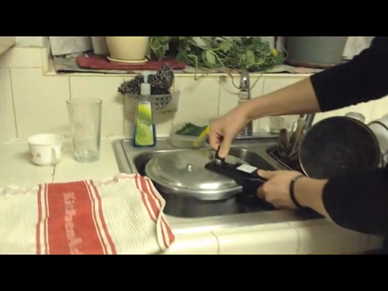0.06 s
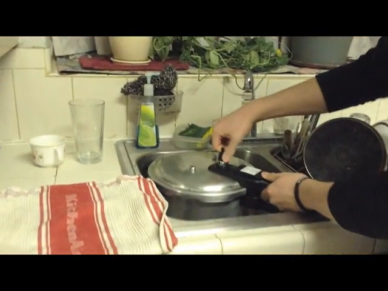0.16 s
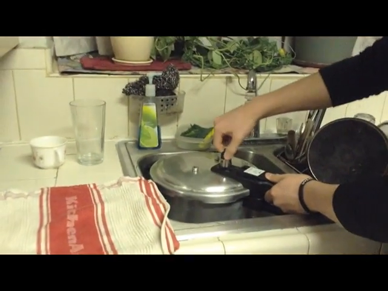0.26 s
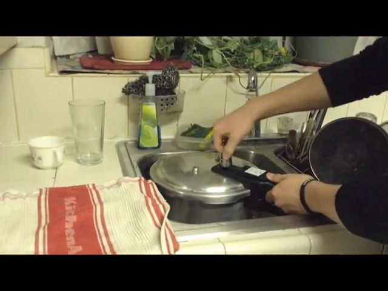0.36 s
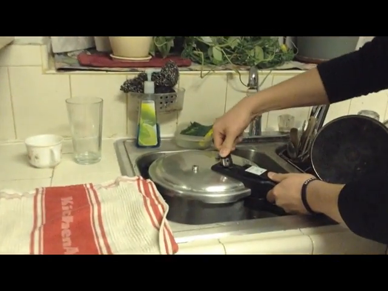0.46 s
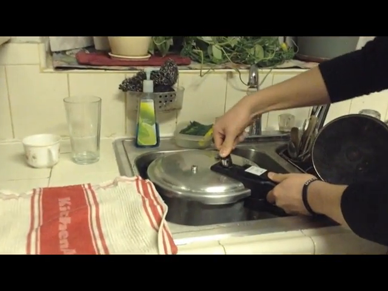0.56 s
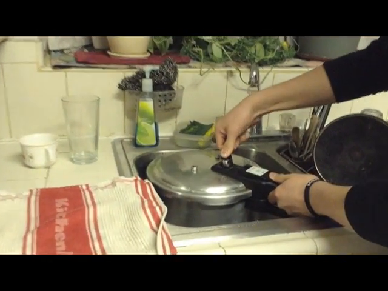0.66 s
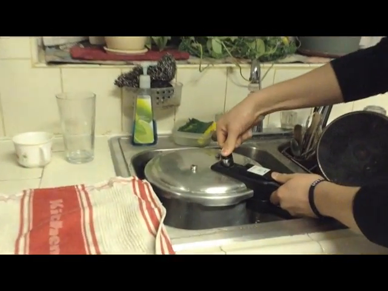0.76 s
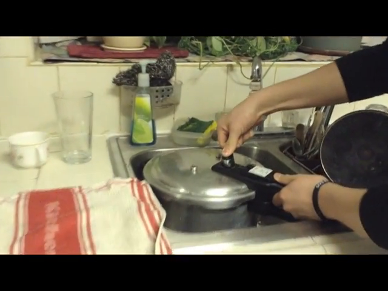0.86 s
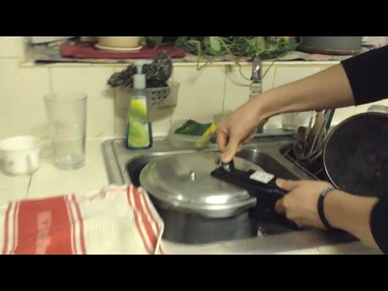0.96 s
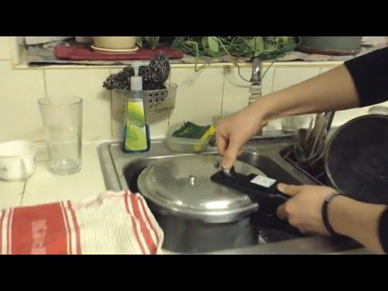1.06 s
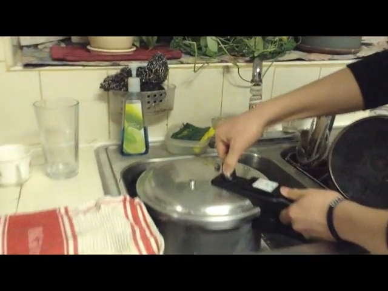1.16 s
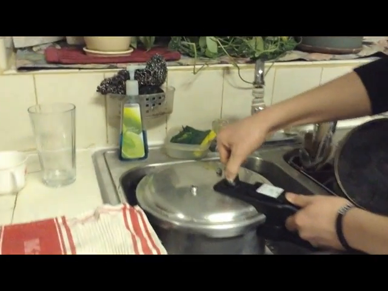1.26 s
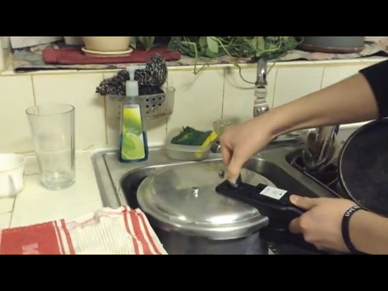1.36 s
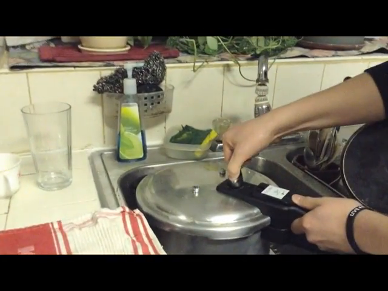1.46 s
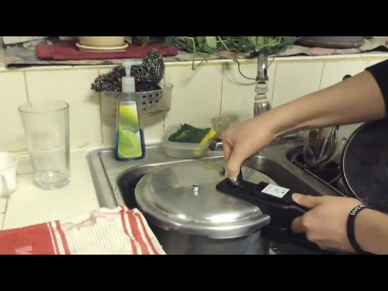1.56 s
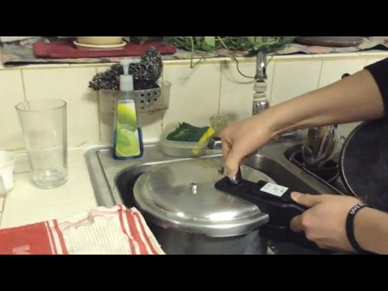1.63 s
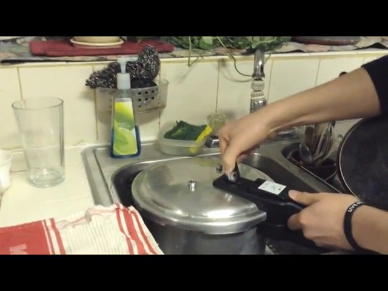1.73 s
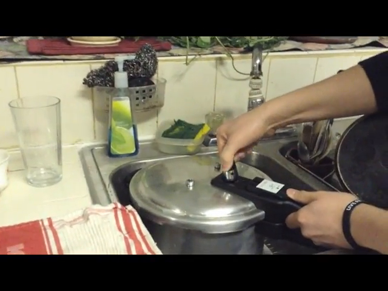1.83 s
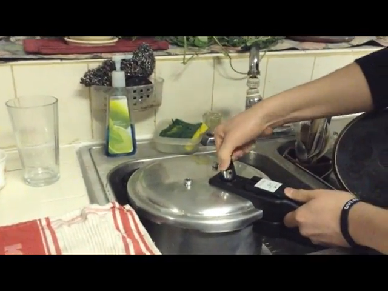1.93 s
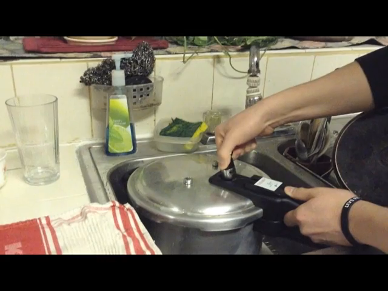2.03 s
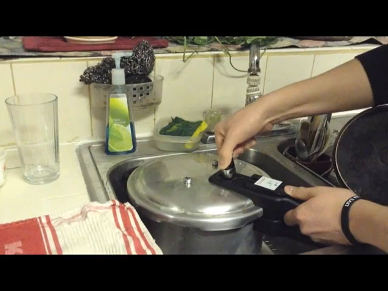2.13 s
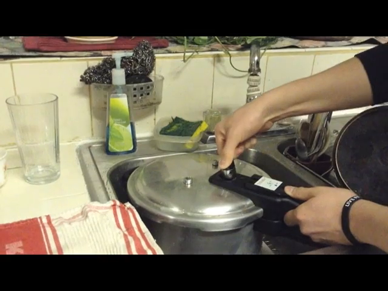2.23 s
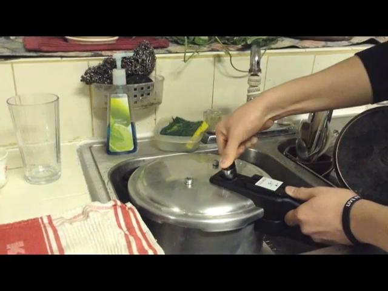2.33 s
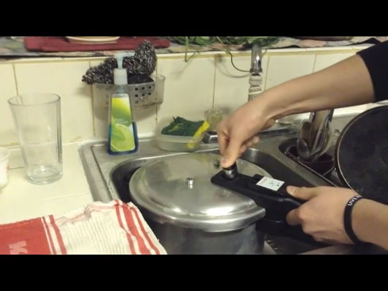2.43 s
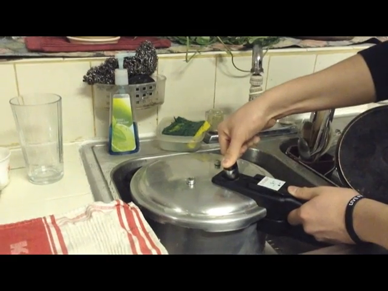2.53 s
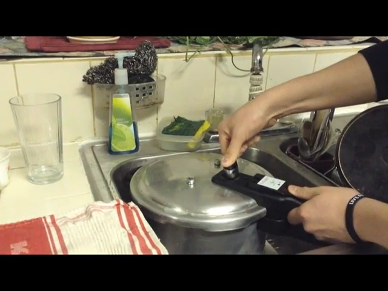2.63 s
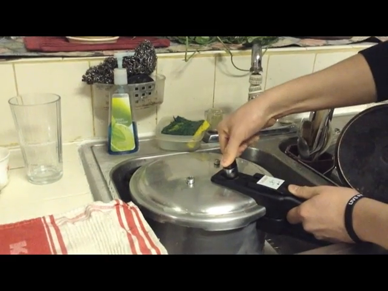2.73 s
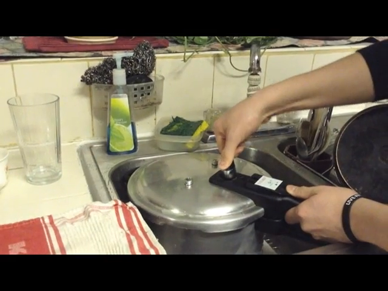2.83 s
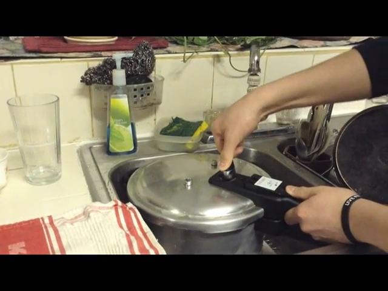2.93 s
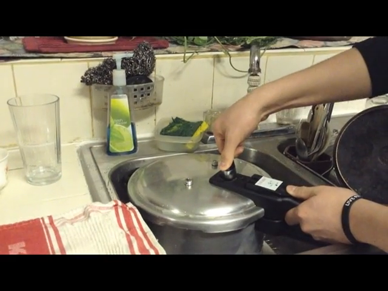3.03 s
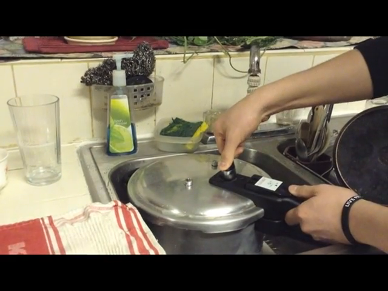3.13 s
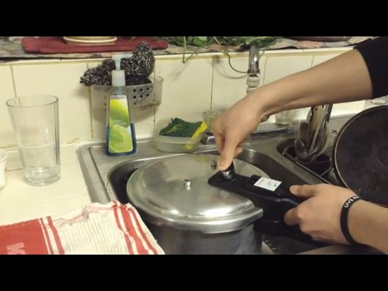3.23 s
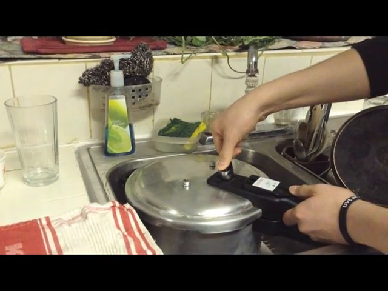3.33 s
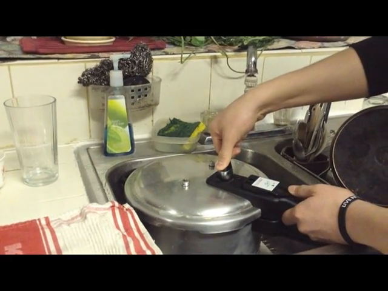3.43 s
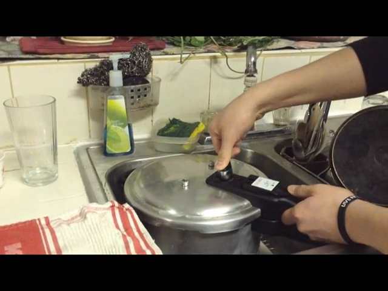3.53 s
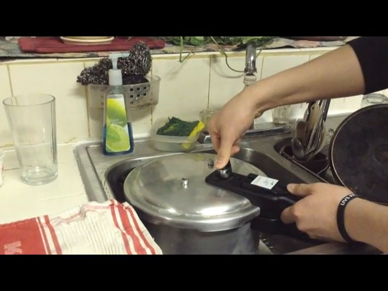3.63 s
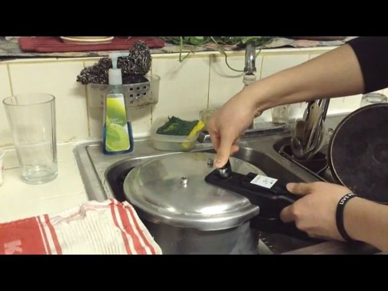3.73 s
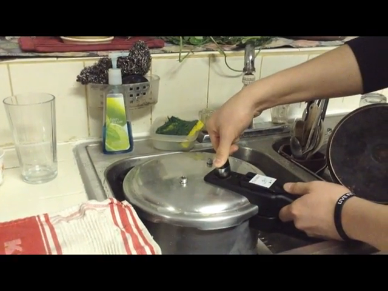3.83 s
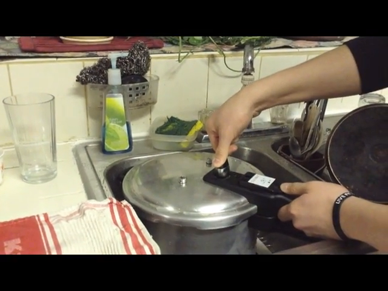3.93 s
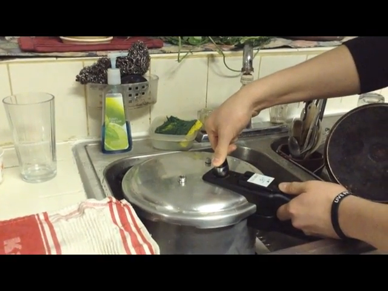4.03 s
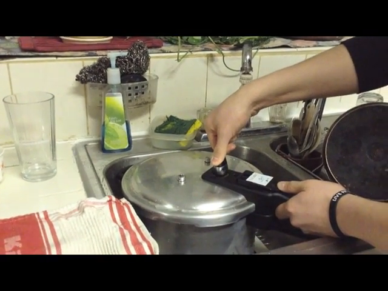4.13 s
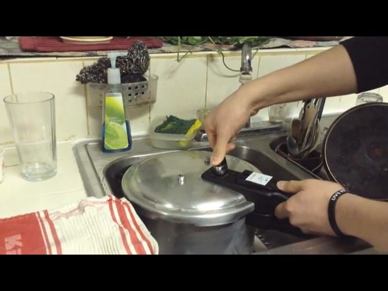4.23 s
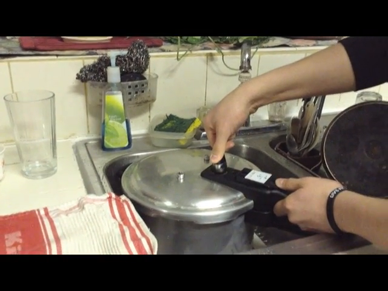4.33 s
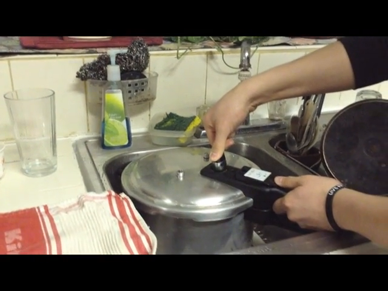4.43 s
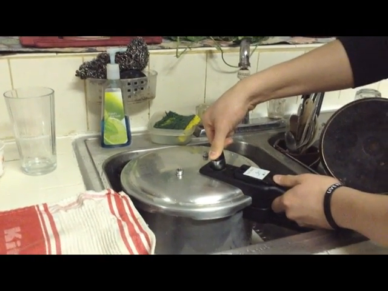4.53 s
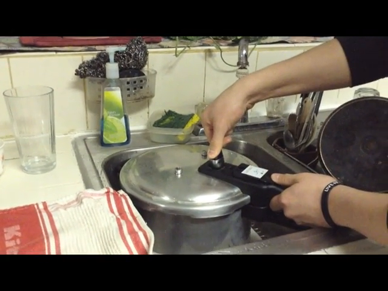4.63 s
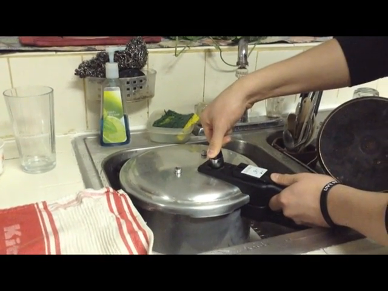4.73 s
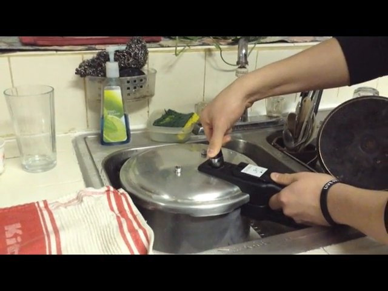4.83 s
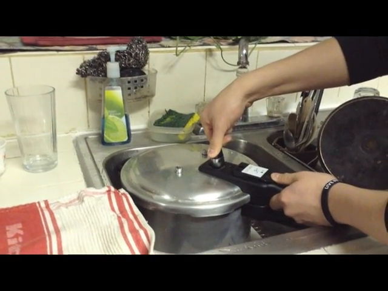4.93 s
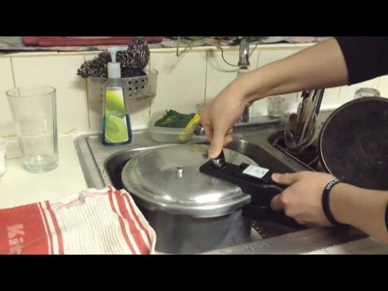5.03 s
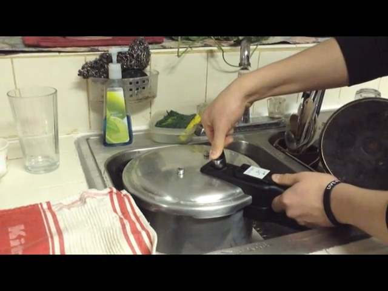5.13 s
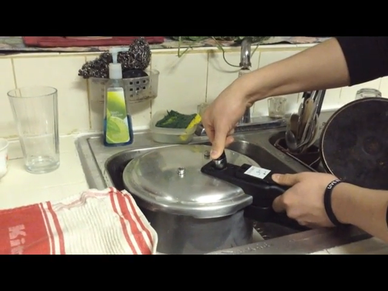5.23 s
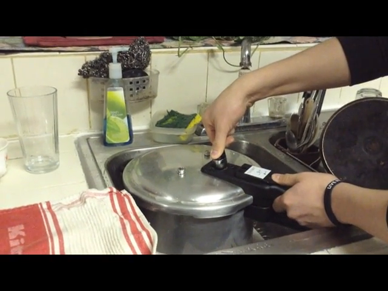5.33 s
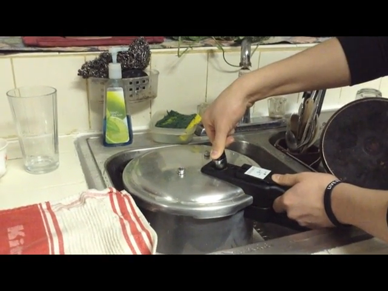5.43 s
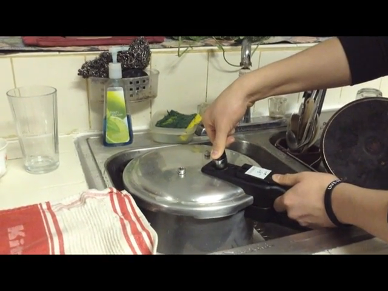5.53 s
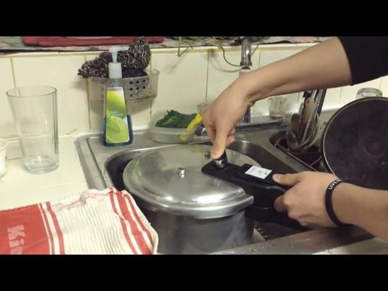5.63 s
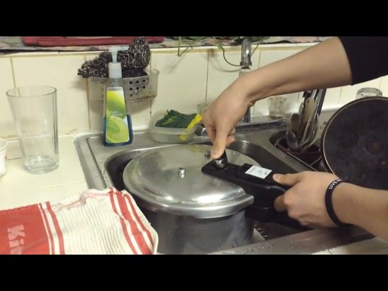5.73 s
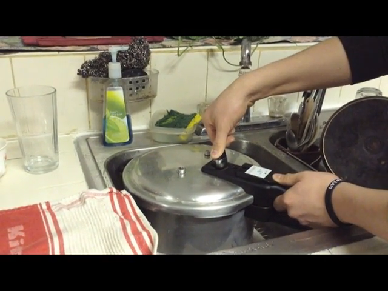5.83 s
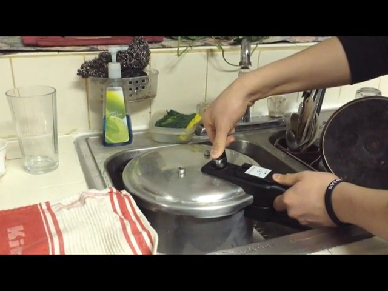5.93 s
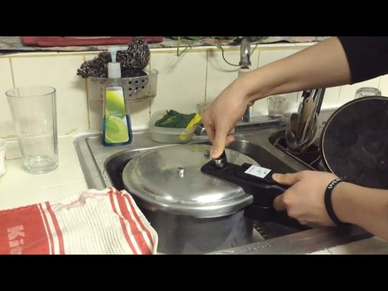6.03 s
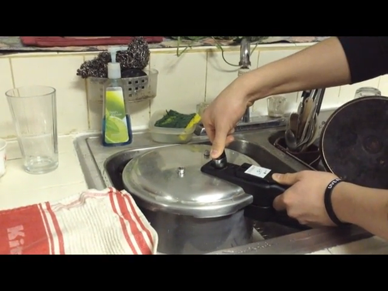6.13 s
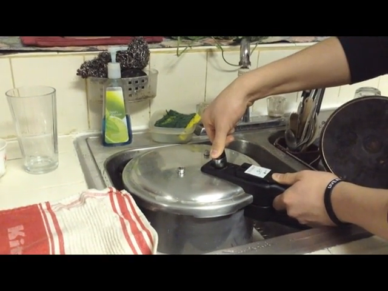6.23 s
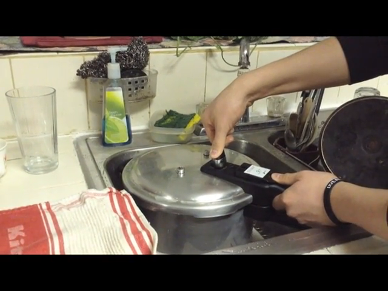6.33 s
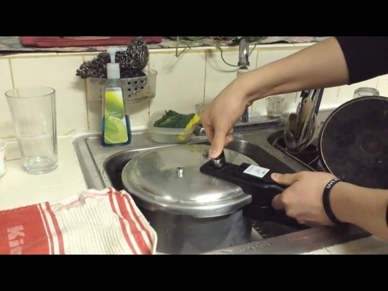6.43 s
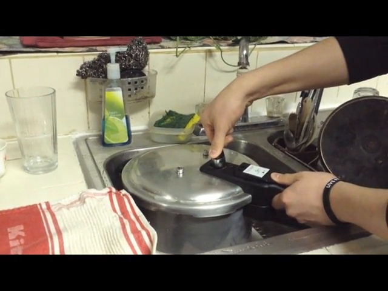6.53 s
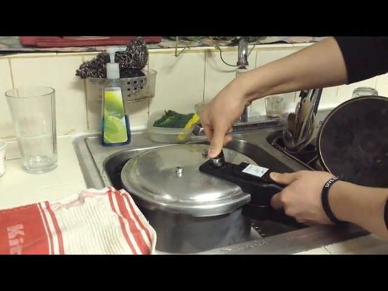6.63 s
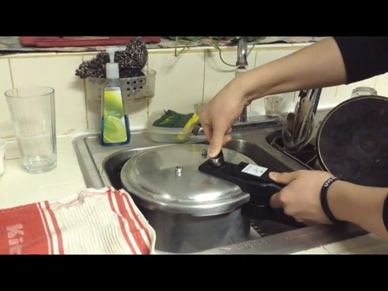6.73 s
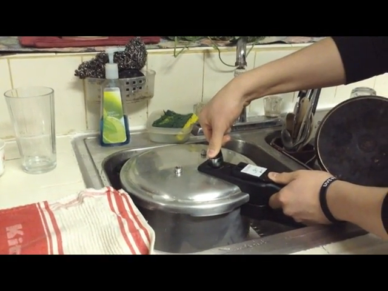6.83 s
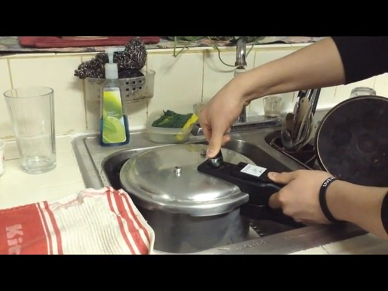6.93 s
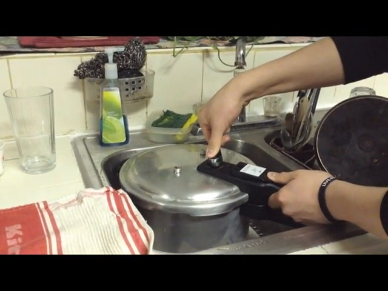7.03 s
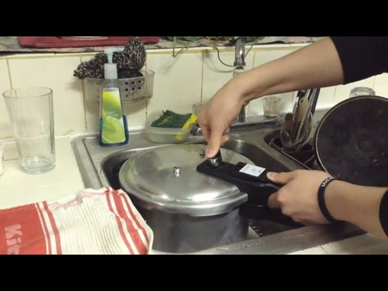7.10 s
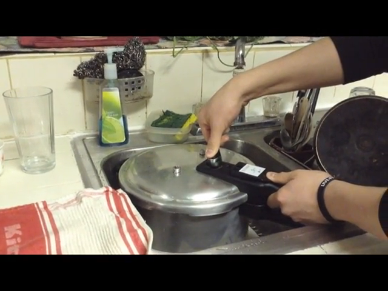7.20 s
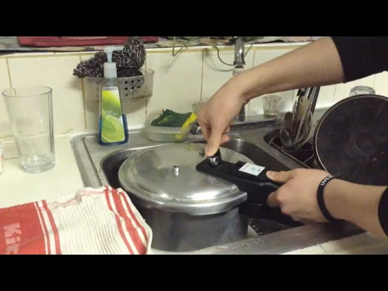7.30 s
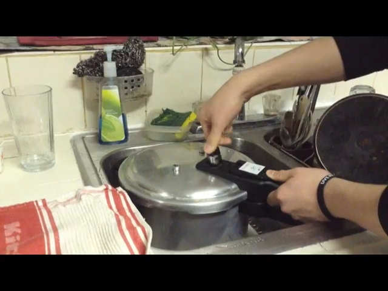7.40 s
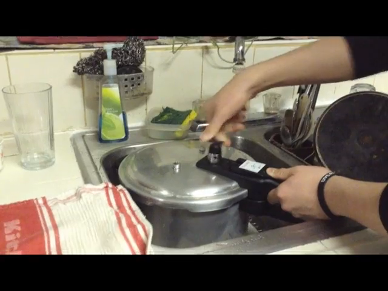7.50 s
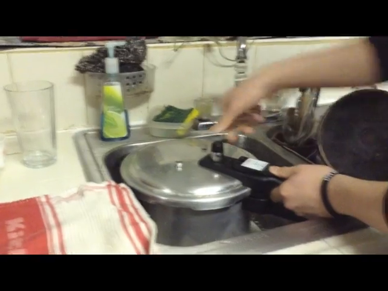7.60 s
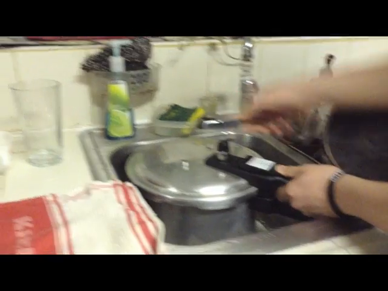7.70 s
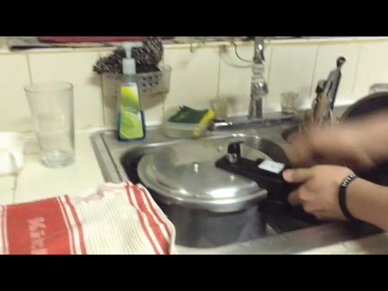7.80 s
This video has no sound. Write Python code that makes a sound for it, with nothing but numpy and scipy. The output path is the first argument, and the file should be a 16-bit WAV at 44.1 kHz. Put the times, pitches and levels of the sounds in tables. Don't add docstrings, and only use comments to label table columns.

```python
import sys
import numpy as np
from scipy import signal
from scipy.fft import rfft, irfft, next_fast_len
from scipy.io import wavfile
from scipy.ndimage import uniform_filter1d, map_coordinates

SR = 44100
rng = np.random.default_rng(int(sys.argv[2]) if len(sys.argv) > 2 else 0)


def bounce(signal):
    frames = np.transpose(np.atleast_2d(signal))
    limited = np.clip(frames, -1, 1)
    pcm = np.round(limited * 32767).astype(np.int16)
    wavfile.write(sys.argv[1], SR, pcm)


def invert_db(level):
    return 10 ** (np.asarray(level, dtype=float) / 20)


N = 346626
TIME = np.arange(N) / SR

# time in seconds, strength in dB.
PRESSURE = [(0, -31.5), (1.3, -33.5), (1.8, -33.5), (2.45, -35.5), (3.0, -37.5), (4.0, -41.5), (5.2, -46),
            (5.8, -48.5), (6.3, -53), (6.8, -61), (7.1, -70.5)]
# time in seconds, looseness from 0 to 1.
LOOSENESS = [(0, 0.9), (.64, 1), (.7, 0.54), (2.2, 0.16), (3, 0), (8, 0.17)]
# start in seconds, length in seconds, gap in dB.
ROCKS = [(0, 0.75, 6), (.12, 0.02, -2), (.15, 0.03, 2.5), (.19, .07, 1), (.27, 0.16, 4.5), (.275, .055, 2),
         (.362, 0.005, 3), (.383, .005, -3), (.44, 0.046, -2), (.497, 0.0063, 4), (.525, 0.01, 4),
         (.575, 0.018, 3), (.605, .01, -2.5), (.69, 0.04, -2), (.89, 0.01, 1), (.96, 0.0097, 1.5),
         (1.05, 1, -1), (1.62, 0.13, -1), (1.87, 0.063, 1.5), (2.0, 0.035, -1.5), (2.1, 0.56, 2),
         (5.17, 0.11, 1)]
# time in seconds, level over the fizz in dB.
SPITS = [
    (.011, 12.5),
    (.458, 4),
    (.575, -1),
    (.633, 1),
    (1.765, 9),
]
# pitch in Hz, width in Hz, level in dB.
VENT_OPEN = [(2767, 90, -29.5), (3280, 92, -16), (3550, 230, -7), (3940, 260, 2), (4180, 110, -5),
             (4420, 200, -4), (4760, 90, 1), (5020, 90, 3), (5190, 120, -1), (5530, 130, 1),
             (5880, 140, -6), (6000, 160, -12.5), (6300, 240, -14.5)]
# pitch in Hz, width in Hz, level in dB.
VENT_LOOSE = [(2436, 96, -14.5), (2796, 83, -8.5), (3150, 180, -8.5), (3564, 110, -5.5), (3896, 78, 2),
              (3980, 50, -3), (4195, 110, -8.5), (4380, 81, -2.5), (4490, 75, -5), (4720, 49, -1.5),
              (5070, 124, -3.5), (5530, 120, -12.5), (5700, 100, -14.5)]
# pitch in Hz, width in Hz, level in dB.
VENT_HELD = [(2890, 31, -15), (3010, 80, -14.5), (3200, 92, -18), (3460, 180, -6), (3614, 130, 1),
             (3725, 56, 0.5), (3900, 220, -5.5), (4165, 110, 0), (4480, 70, -2), (4730, 120, -1.5),
             (5048, 90, 0), (5186, 122, -.5), (5330, 160, -3.5), (5081, 87, -9), (5666, 55, -7.5),
             (6200, 46, -15.5), (5930, 50, -6.5)]
# frequency in Hz, level in dB per Hz.
FIZZ_LOOSE = [(8000, -43.5), (9500, -17), (11300, -13), (12300, -3), (13000, 1), (13700, -2), (14500, -8),
              (15400, -12)]
# frequency in Hz, level in dB per Hz.
FIZZ_HELD = [(8800, -48), (9800, -27.5), (11000, -17), (12000, -10), (13000, -5), (13700, 1.5), (14500, -2),
             (15500, -13)]
# pitch in Hz, width in Hz, level in dB.
FIZZ_WEAK = [(9970, 380, -22), (11130, 300, -20.5), (11850, 250, -25), (12340, 350, -18), (12900, 250, -19),
             (13040, 290, -10), (13830, 720, -4), (14330, 220, 1), (14520, 300, -2), (14970, 260, -11),
             (15300, 180, -6)]
# frequency in Hz, level in dB per Hz.
SPRAY = [(4000, -42.5), (5600, -5), (6100, -3), (6300, -2), (7000, -2.5), (8500, -7), (10000, -7),
         (12000, -33)]
# frequency in Hz, level in dB per Hz.
ROAR = [(59, -67), (100, -34), (250, -21), (420, -32), (538, -15.5), (985, -15), (1080, -11), (1320, -8.5),
        (2000, -6.5), (3400, 5.5), (4420, -31.5), (7480, -120)]
# pitch in Hz, level in dB.
LID_SONG = [(820, -6), (1258, 0), (1800, -14)]
# pitch in Hz, width in Hz, level in dB.
LID_SHAKE = [(540, 28, -8), (1065, 45, -1), (1250, 30, -2), (1630, 120, -5), (1785, 45, -1), (1900, 40, -5),
             (290, 80, -19)]
# pitch in Hz, width in Hz, level change in dB.
SLOTS = [(3300, 60, -3), (4350, 170, -11), (4790, 120, -15), (5500, 78, 2), (5960, 90, -7),
         (6120, 160, -19), (6370, 70, -12), (6530, 110, -14), (6700, 60, -8), (6880, 60, -9),
         (7950, 120, -6), (8250, 150, -10.5), (9880, 260, -9), (10800, 90, -5), (11090, 90, -12),
         (11550, 200, -17), (12060, 60, -10), (14430, 120, -6), (15170, 100, -9)]
# pitch in Hz, width in Hz, depth in dB.
SINK = [(2180, 50, -10), (2410, 40, -4), (2660, 70, -7), (3390, 50, -9), (3810, 60, -6), (4020, 90, -4),
        (4330, 90, -6), (4545, 45, -8), (4915, 45, -8), (5400, 50, -5), (5590, 50, -5), (5830, 60, -7),
        (6160, 60, -6), (6700, 80, -2)]
# time in seconds, peak in dB, brightness in dB per octave.
KNOCKS = [(0.287, -23, 5), (0.497, -47, 5), (0.575, -44, -6), (0.635, -34, -18), (0.75, -34.5, -21),
          (0.86, -33.5, 8.5), (0.891, -31, 22), (1.055, -51, 4), (1.23, -31, 8), (1.365, -34, -14),
          (1.989, -61, -2), (2.172, -46.5, -13), (2.248, -31.5, 0), (2.279, -38, -14), (2.356, -38.5, -9),
          (2.406, -43, -16)]
# pitch in Hz, level in dB, time to fade by 60 dB in seconds.
LID = [(543, 7.5, 0.11), (560, -4, 0.11), (617, 0.5, 0.18), (700, -7.5, .08), (805, 6, 0.14),
       (1075, -1.5, 0.061), (1250, -10.5, 0.064), (1880, 4.5, 0.12), (2050, -7, 0.073)]
# time in seconds, peak in dB, slap over peak in dB, brightness in dB per octave.
BUMPS = [(0.009, -39.5, 6.5, -15), (0.897, -61, -9, -1), (1.761, -32.5, -2.5, 2), (1.784, -32, -7.5, -3.5),
         (2.54, -52.5, -12, -3), (3.652, -52, -12, -1), (3.723, -57.5, 7.5, 5), (4.079, -60, 1, -8),
         (4.359, -76, -6, -2), (4.569, -51.5, 0, -8), (4.808, -56, -2, -5), (5.174, -56, 4, -7),
         (5.618, -52, -3, -11), (6.284, -51, -18, 2), (7.117, -51, -8, 9), (7.17, -58, -12, -8),
         (7.383, -51.5, -4.5, -19)]
# pitch in Hz, level in dB, time to fade by 60 dB in seconds.
BASIN = [(125, -9, 0.2), (151, -3.5, 0.25), (176.3, -1, 0.22), (205, -3.5, 0.2), (260, -6, .15),
         (323, -6.5, 0.12), (344, -2, 0.17), (509, 5, 0.16), (534, 1, .14), (680, 0.5, 0.204),
         (870, 2, 0.11)]
# time in seconds, peak in dB, ring over crack in dB,
# brightness in dB per octave, damping while it still touches (times the normal fading speed).
DROPS = [
    (7.5333, -10, -25, 3, 1.5),
    (7.5343, -6, 6, 1, 1.9),
    (7.5372, -8, -20, 0, 1.5),
    (7.5435, -22, -8, 2, 2),
    (7.553, -23, -6, 4, 1.5),
    (7.5622, -15.5, 7, 0, 1.4),
    (7.5711, -23, -1, 2, 1.3),
]
# pitch in Hz, level in dB, time to fade by 60 dB in seconds.
WEIGHT = [(248, -17, .15), (340, -15, .1), (500, -15, .12), (670, -15, .14), (765, -12, .2),
          (1100, -5, .07), (1146, 1, .14), (1190, 0, .05), (1280, 0, .05), (1345, 0, .14), (1411, -5, .12),
          (1805, -3, .11), (1990, -6, .11), (2250, -10, .1), (2525, -10, .1), (2650, -8, .12),
          (2960, -9, .1), (3390, -10, .12), (3520, -9, .1), (4544, -18, .1), (4786, -18, .1),
          (4936, -15, .07), (5450, -23, .1), (6430, -20, .07)]
# time in
# seconds, crack in dB, ping in dB, ping pitch in Hz, time to fade by 60 dB in seconds.
TICKS = [(.79, -56, -37, 1800, .04), (0.881, -60, -39, 560, 0.042), (.892, -60, -34, 1200, .04),
         (1.053, -60, -47, 660, 0.11), (1.075, -60, -37, 2050, 0.059), (1.15, -65, -40, 1250, 0.098),
         (1.245, -65, -46, 820, 0.1), (1.37, -65, -45, 820, 0.099), (1.44, -65, -45, 1248, 0.2),
         (1.88, -65, -53, 1268, .25), (1.8, -62, -41.5, 796, .1), (1.85, -62, -47, 540, .1),
         (1.91, -65, -49, 820, .15), (2.065, -58, -45.5, 820, 0.15), (1.985, -45.5, -40, 1260, 0.1),
         (1.985, -56, -36, 1850, 0.045), (2.215, -54, -44, 640, .05), (2.222, -62, -42, 1950, .04),
         (2.45, -62, -45, 600, 0.035), (2.505, -56, -50, 800, .04), (2.691, -68, -51, 1250, 0.13),
         (2.856, -58, -45, 1250, 0.15),
         (7.377, -43.5, -44, 3900, 0.026), (7.379, -50, -42, 3000, 0.014), (7.38, -51, -35, 1127, 0.019),
        (7.384, -60, -42, 1440, .02), (7.43, -59, -50, 3450, 0.024), (7.432, -65, -38, 1150, 0.018),
        (7.433, -65, -40, 1420, .018), (7.49, -65, -47, 450, 0.043), (7.509, -62, -53, 1150, 0.12),
        (7.516, -58, -62, 3000, .03), (7.511, -68, -59, 1150, .08), (7.593, -52, -48, 1416, 0.05),
        (7.642, -60, -43, 1350, .03), (7.65, -57, -54, 3550, 0.048), (7.702, -68, -55, 1400, .04),
        (7.761, -58, -49, 1410, 0.038), (7.764, -65, -45, 680, 0.042), (7.792, -68, -55, 3950, 0.044),
        (7.794, -73, -58, 11900, .05), (7.815, -58, -58, 13500, .012), (7.815, -65, -54, 3460, .04),
        (7.819, -55, -50, 2050, 0.04), (7.832, -53, -55, 3600, .02), (7.857, -52, -60, 3000, .02)]
# frequency in Hz, level in dB per Hz.
CRACK = [(88, -65), (150, -33), (400, -20), (549, -9), (880, -26), (1040, -26), (1340, -5.5), (2010, -12.5),
         (4910, -17.5), (8280, -36.5), (12000, -38.5), (15400, -52)]
# frequency in Hz, level in dB per Hz.
SCUFF = [(70, -29), (150, -1), (320, 1.5), (480, -14), (800, -3), (1500, -1), (2200, -3), (3300, -8),
         (5500, -21.5), (9000, -36), (15400, -39.5)]
# frequency in Hz, level in dB per Hz.
CLOTH = [(100, -31.5), (180, -9), (300, -7.5), (420, -16.5), (750, -2.5), (1300, -4.5), (2200, -10.5),
         (4000, -15.5), (7000, -26.5), (15400, -44)]
# start in seconds, length in seconds, level in dB.
STROKES = [(2.7, 2.5, -65.5), (2.86, .03, -59), (3.255, 0.015, -59), (3.66, 0.069, -54.5),
           (4.33, 0.075, -54.5), (4.53, 0.045, -56), (5.17, 0.041, -66), (5.33, 0.016, -61),
           (5.5, 1.14, -59.5), (6.26, 0.044, -64), (4.9, 0.33, -66.5), (7.13, 0.11, -58.5),
           (7.28, 0.25, -66), (7.69, 0.17, -60.5)]
# start in seconds, length in seconds, level in dB.
SECOND = [(1.25, 0.53, -67.5), (1.93, 0.15, -71), (2.54, 0.51, -66), (3.4, 0.54, -71), (4.03, 0.13, -69),
          (4.54, 0.045, -77), (4.85, 0.17, -67), (5.17, 0.091, -63), (5.55, 0.17, -66), (5.95, 0.83, -69.5),
          (6.3, 0.14, -67), (6.72, .3, -79), (7.05, 0.21, -68.5), (7.42, 0.39, -61.5), (7.66, .06, -68),
          (7.83, .05, -64)]
# start in seconds, length in seconds, level in dB.
THIRD = [
    (.4, 0.3, -58),
    (1.93, 0.16, -69),
    (2.54, 0.58, -66),
    (3.346, 0.24, -62),
    (5.19, 0.28, -62.5),
    (5.803, 0.95, -69),
    (7.12, .12, -67),
    (7.43, 0.45, -65),
]
# frequency in Hz, level in dB per Hz.
AIR = [(30, -10), (90, -24), (177, -8), (517, -19.5), (637, -8), (894, -10), (1100, -9), (1510, -12.5),
       (3210, -29.5), (8000, -31.5), (14000, -34), (15400, -38)]
# frequency in Hz, time to fade by 60 dB in seconds.
KITCHEN = [(200, 0.43), (1500, 0.26), (5000, 0.16), (12000, 0.16)]


def steam():
    strength_db = curve(PRESSURE)
    vent_db, fizz_db, spray_db, roar_db = jet_levels(strength_db)
    loose = np.clip(curve(LOOSENESS), 0, 1)
    held = np.sqrt(1 - loose)
    wide = np.clip((0.27 - TIME) / 0.03 + 1, 0, 1) * 0.8 + 0.1 * loose

    overtone = held ** 2 * rush(lambda hz: resonant([(10500, 620, 0)])(hz) ** 2, patchy_db=-2.5)
    jet = invert_db(vent_db - 22) * overtone
    jet += invert_db(vent_db + 1.88) * vent_whistle(loose, held)
    jet += invert_db(fizz_db + 0.65 + 4.5 * wide - 3 * loose) * fine_fizz(strength_db, wide)
    jet += invert_db(spray_db) * rush(coloured(SPRAY), patchy_db=-0.5)
    jet += invert_db(roar_db + 4.5) * (rush(coloured(ROAR), patchy_db=1.7) + lid_hum(loose, held))

    bite = np.clip((-35 - strength_db) / 7, 0, 1)
    jet = (1 - bite) * jet + bite * filtered(jet, dips(SLOTS))

    sputter_db = (0.2 + 0.15 * loose) * wobble(60)
    sputter_db += (0.25 + 0.7 * loose) * wobble(260)
    sputter_db += 0.2 * wobble(12)
    shut_db = -80 * np.clip((TIME - 7.1) / 0.11, 0, 1)
    return invert_db(shut_db + sputter_db) * jet


def jet_levels(strength_db):
    shape, db = holds(ROCKS, rise=0.018, fall=0.012)
    gap_db = np.sum(shape * db, axis=0)
    spit_s = 0.0122
    burst_db = sum(db * (TIME > s) * np.exp(-abs(TIME - s) / spit_s) for s, db in SPITS)
    below_full_db = strength_db + 33.5
    weak_db = 2 * np.minimum(strength_db + 46.5, 0)
    thin_db = 1.15 * np.minimum(strength_db + 41.5, 0)
    fizz_db = strength_db + weak_db - 0.11 * gap_db + burst_db
    spray_db = -43 + 1.6 * below_full_db + thin_db + 0.16 * gap_db + 0.79 * burst_db
    roar_db = -43.5 + 1.42 * below_full_db + weak_db + 0.96 * gap_db
    return strength_db + gap_db, fizz_db, spray_db, roar_db


def vent_whistle(loose, held):
    sunk = np.clip((TIME - 0.425) / 0.015, 0, 1)
    rocking = np.sqrt(1 - sunk) * rush(resonant(VENT_OPEN), patchy_db=0.7)
    rocking += np.sqrt(sunk) * rush(resonant(VENT_LOOSE), patchy_db=0.8)
    bore = lambda hz: resonant(VENT_HELD)(hz) / (1 + (hz / 5900) ** 16)
    return np.sqrt(loose) * rocking + held * rush(bore, patchy_db=0)


def fine_fizz(strength_db, wide):
    thin = np.clip((-37.5 - strength_db) / 14.5, 0, 1)
    half = [(hz, width, db / 2) for hz, width, db in FIZZ_WEAK]
    steep = lambda hz: resonant(half)(hz) ** 2
    narrow = (1 - thin) * rush(coloured(FIZZ_HELD), patchy_db=1)
    narrow += np.sqrt(1 - (1 - thin) ** 2) * rush(steep, patchy_db=2)
    return np.sqrt(wide) * rush(coloured(FIZZ_LOOSE), patchy_db=1) + np.sqrt(1 - wide) * narrow


def lid_hum(loose, held):
    fade = np.clip((2.45 - TIME) / 0.5, 0.45, 1) * np.clip((3.3 - TIME) / 0.4, 0, 1)
    song = invert_db(-14.5) * held ** 2 * singing(LID_SONG, drift_hz=7, flutter_db=3.5) * fade
    shake = loose ** 2 * rush(resonant(LID_SHAKE), patchy_db=1)
    return song + invert_db(-8.5 + 0.8 * wobble(17)) * shake


def drops():
    out = np.zeros(N)
    add(out, 7.094, invert_db(-45) * puff(SCUFF, t60=0.4, rise=0.0024))
    for s, crack_db, ping_db, hz, t60 in TICKS:
        crack = puff(CRACK, t60=0.06, rise=0.00065)
        ping = ring([(hz, 0, t60)], 0, scatter_db=0, damping=0.62)
        add(out, s, invert_db(crack_db) * crack + invert_db(ping_db) * ping)
    for s, db in [(7.546, -33), (7.584, -34)]:
        add(out, s, invert_db(db) * ring([(250, 0, 0.09)], 0, scatter_db=0, damping=1))
    for s, db, ring_db, tilt_db, damping in DROPS:
        metal = ring(WEIGHT, tilt_db, scatter_db=1, damping=damping)
        rattle = puff(CRACK, t60=0.014, rise=0.0004) + invert_db(-18) * puff(CRACK, t60=0.2, rise=0.002)
        add(out, s, invert_db(db - 3) * rattle + invert_db(db + ring_db - 6.5) * metal)
    return out


def knocks():
    out = np.zeros(N)
    for s, db, tilt_db in KNOCKS:
        lid = ring(LID, tilt_db, scatter_db=2, damping=2.2)
        click = puff(CLOTH, t60=0.075, rise=0.0019)
        add(out, s, invert_db(db + 1) * (lid + invert_db(-12) * click))
    for s, db, slap_db, tilt_db in BUMPS:
        basin = ring(BASIN, tilt_db, scatter_db=2, damping=1.4)
        slap = puff(SCUFF, t60=0.25, rise=0.006)
        add(out, s, invert_db(db - 0.9) * (basin + invert_db(slap_db) * slap))
    return out


def rustle():
    unevenness = invert_db(0.4 * wobble(70) + 0.84 * wobble(16))
    return swells(STROKES, rise=0.087, fall=0.055) * unevenness * rush(coloured(CLOTH), patchy_db=0.5)


def motor_hum():
    turn = 2 * np.pi * np.cumsum(93.1 + 0.5 * wobble(3) + 2.5 * wobble(30)) / SR
    second = invert_db(-80.5) + swells(SECOND, rise=0.15, fall=0.045)
    third = invert_db(-80.5) + swells(THIRD, rise=0.15, fall=0.045)
    hum = second * invert_db(2 + 3.2 * wobble(21)) * np.sin(2 * turn)
    hum += third * invert_db(-2.5 + wobble(11)) * np.sin(3 * turn)
    hum += invert_db(-79 + 1.4 * wobble(4)) * np.sin(4 * turn)
    return hum + invert_db(-92.5) * np.sin(turn)


def background():
    return invert_db(-64) * rush(coloured(AIR), patchy_db=0.5) + rustle() + motor_hum()


def kitchen(x):
    hz, t, z = signal.stft(rng.standard_normal(SR // 2), SR, nperseg=256)
    fading = invert_db(-60 * t / along(KITCHEN, hz)[:, None])
    tail = signal.istft(z * fading, SR, nperseg=256)[1]
    late = np.pad(x, (200, 0))
    return signal.fftconvolve(late, tail / np.linalg.norm(tail))[:N]


def unit(x):
    return x / np.sqrt(np.mean(x ** 2) + 1e-20)


def along(points, hz):
    f, v = np.transpose(points)
    return np.interp(np.log(hz + 1), np.log(f + 1), v)


def curve(points):
    s, v = np.transpose(points)
    return np.interp(TIME, s, v)


def wobble(rate):
    return map_coordinates(rng.standard_normal(int(N * rate / SR) + 4), [TIME * rate])


def holds(rows, rise, fall):
    start, length, value = np.transpose(rows)[:, :, None]
    ease = 0.24 * length
    up = np.clip((TIME - start + rise) / (rise + ease), 0, 1) ** (start > 0)
    down = np.clip((start + length + fall - TIME) / (fall + ease), 0, 1)
    return up * down, value


def swells(rows, rise, fall):
    shape, db = holds(rows, rise, fall)
    return np.sqrt(np.sum((shape * invert_db(db)) ** 2, axis=0))


def filtered(x, response):
    m = next_fast_len(len(x) + 8192)
    return irfft(rfft(x, m) * response(np.fft.rfftfreq(m, 1 / SR)), m)[:len(x)]


def coloured(spectrum):
    return lambda hz: invert_db(along(spectrum, hz))


def resonant(peaks):
    def response(f):
        return sum((-1) ** k * invert_db(db) * 1j * f * w / (c * c - f * f + 1j * f * w)
                   for k, (c, w, db) in enumerate(peaks))
    return response


def dips(rows):
    def response(f):
        return np.prod([(c * c - f * f + 1j * f * w * invert_db(db)) / (c * c - f * f + 1j * f * w)
                        for c, w, db in rows], axis=0)
    return response


def rush(response, patchy_db):
    z = signal.stft(rng.standard_normal(N), nperseg=512)[2]
    field = uniform_filter1d(rng.standard_normal(z.shape), size=6, axis=0)
    field = uniform_filter1d(field, size=8, axis=1)
    noise = signal.istft(z * invert_db(patchy_db * unit(field)), nperseg=512)[1][:N]
    return unit(filtered(noise, response))


def singing(modes, drift_hz, flutter_db):
    total = np.zeros(N)
    for hz, db in modes:
        phase = 2 * np.pi * np.cumsum(hz + drift_hz * wobble(40)) / SR
        total += invert_db(db + flutter_db * wobble(13)) * np.sin(phase)
    return unit(total)


def ring(modes, tilt_db, scatter_db, damping):
    hz, db, t60 = np.transpose(modes)[:, :, None]
    t = np.arange(SR // 4) / SR
    level = db + tilt_db * np.log2(hz / 1000) + scatter_db * rng.standard_normal(hz.shape)
    tone = np.sum(invert_db(level - 60 * t * damping / t60) * np.sin(2 * np.pi * hz * t), axis=0)
    return tone * (1 - np.exp(-t / 0.0033)) / np.sqrt(np.sum(invert_db(level) ** 2))


def puff(spectrum, t60, rise):
    t = np.arange(SR // 4) / SR
    noise = unit(filtered(rng.standard_normal(len(t)), coloured(spectrum)))
    return noise * invert_db(-60 * t / t60) * (1 - np.exp(-t / rise))


def add(track, s, sound):
    part = track[round(s * SR):][:len(sound)]
    part += sound[:len(part)]


def masked(x, depth_db, reach):
    hz, _, z = signal.stft(x, SR, nperseg=2048, noverlap=1024)
    bands = np.add.reduceat(abs(z) ** 2, np.arange(0, len(hz), 8))
    power = np.repeat(bands, 8, axis=0)[:len(hz)]
    power = uniform_filter1d(power, size=3, axis=1)
    upward = signal.lfilter([1 - reach], [1, -reach], power, axis=0)
    downward = signal.lfilter([1 - reach], [1, -reach], power[::-1], axis=0)[::-1]
    keep = (power > invert_db(-depth_db) ** 2 * (upward + downward)) | (hz < 4000)[:, None]
    return signal.istft(z * keep, SR, nperseg=2048, noverlap=1024)[1][:N]


def scene():
    hits = knocks() + drops()
    hiss = steam()
    walls = invert_db(-13) * kitchen(hiss)
    mono = invert_db(0.4) * filtered(hiss + walls, dips(SINK))
    mono += hits + invert_db(-11.5) * kitchen(hits) + background()
    return np.array([mono, mono])


def roll_off(x):
    return signal.sosfilt(signal.butter(12, 16460, fs=SR, output="sos"), x)


def record(dry):
    def band(hz):
        bass_cut = (1j * hz / 95) ** 2 / (1 + 1.4j * hz / 95 - (hz / 95) ** 2)
        return np.clip((15315 - hz) / 60, 0, 1) * bass_cut ** 2
    mono = masked(filtered(dry[0], band), depth_db=15.5, reach=0.972)
    return roll_off(np.array([mono, mono]))


dry = scene()
out = record(dry)
bounce(out)
```